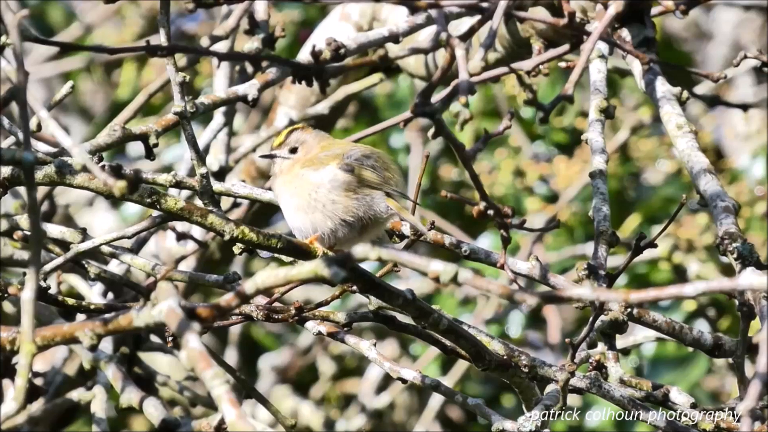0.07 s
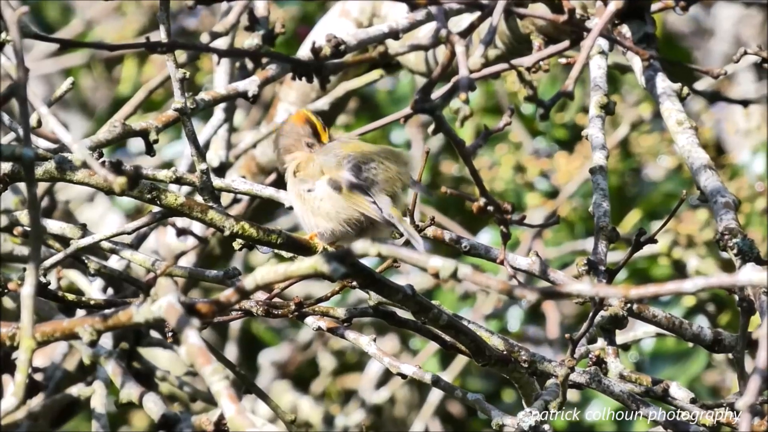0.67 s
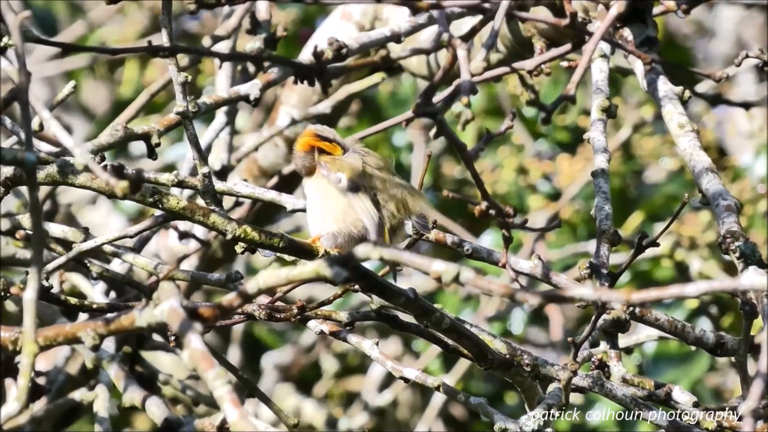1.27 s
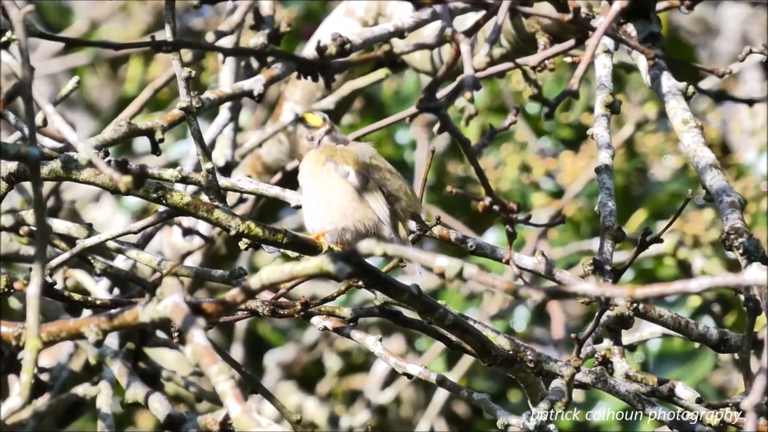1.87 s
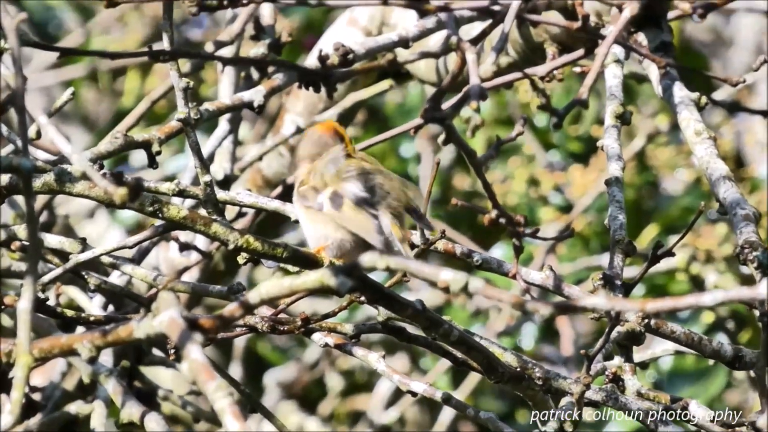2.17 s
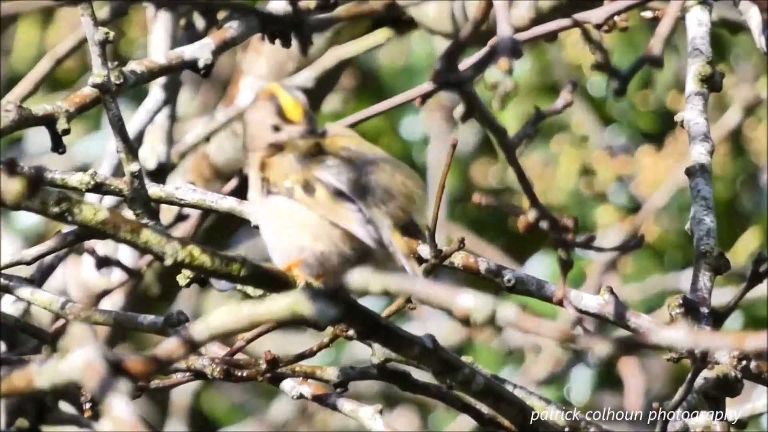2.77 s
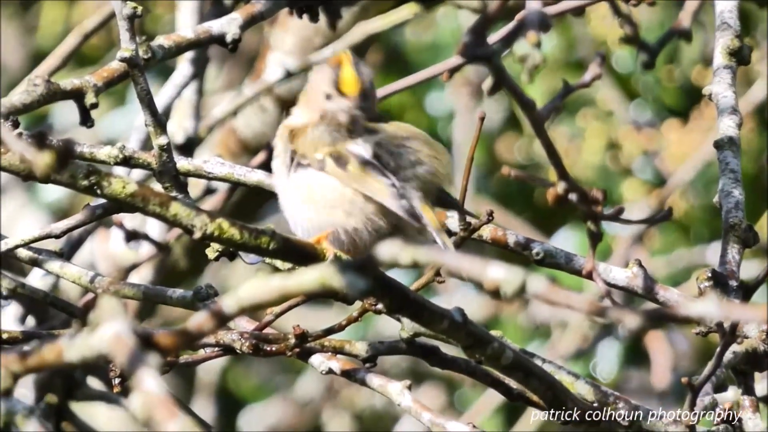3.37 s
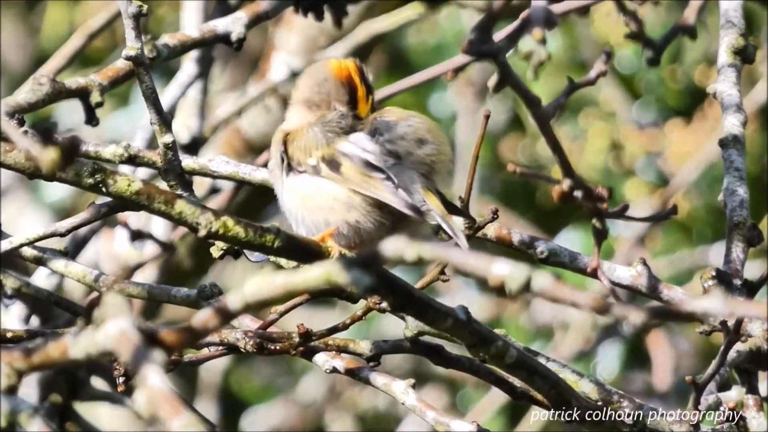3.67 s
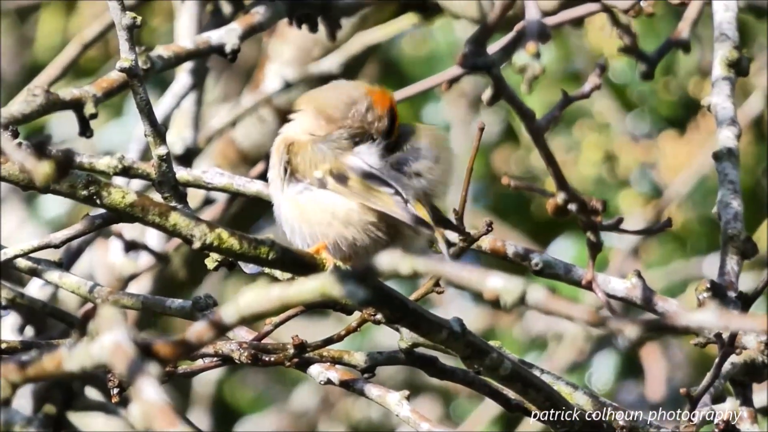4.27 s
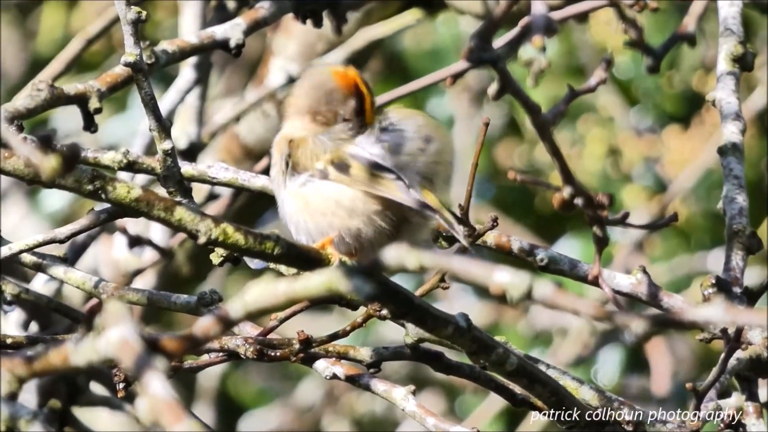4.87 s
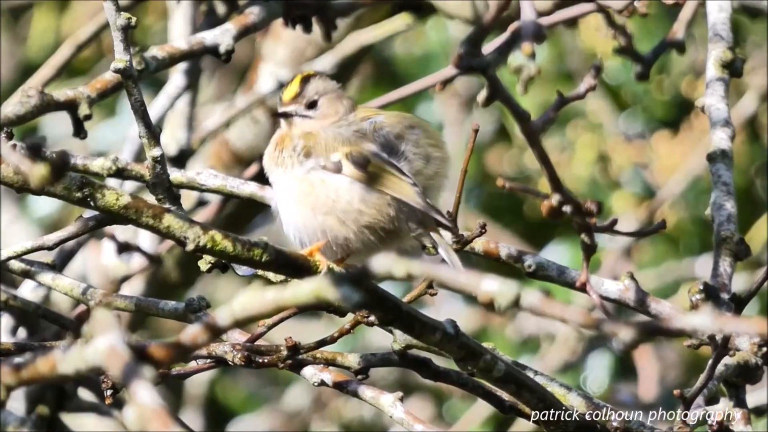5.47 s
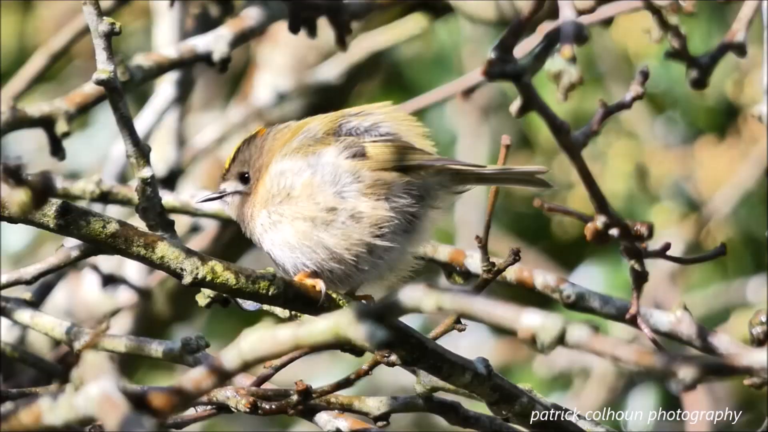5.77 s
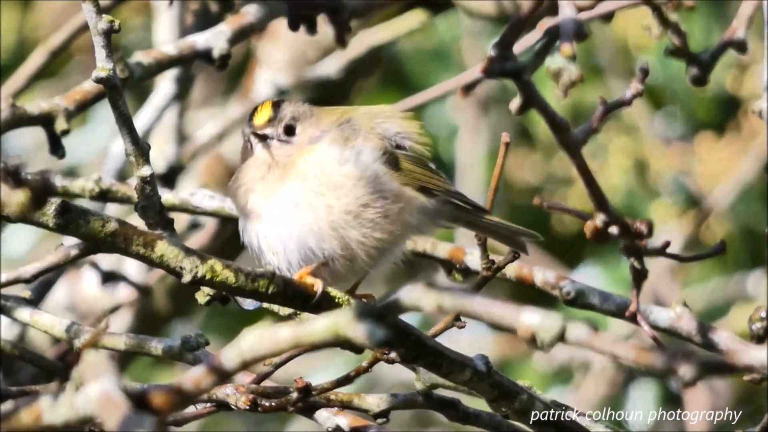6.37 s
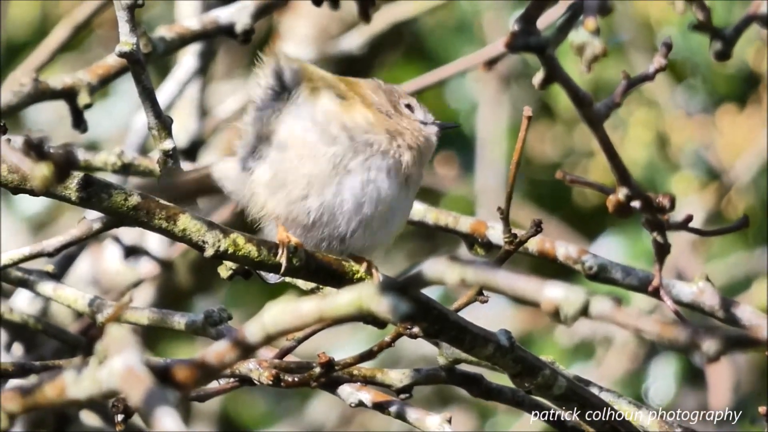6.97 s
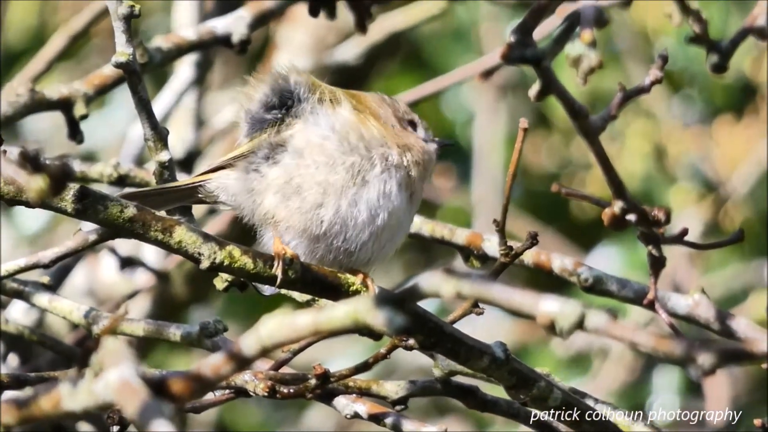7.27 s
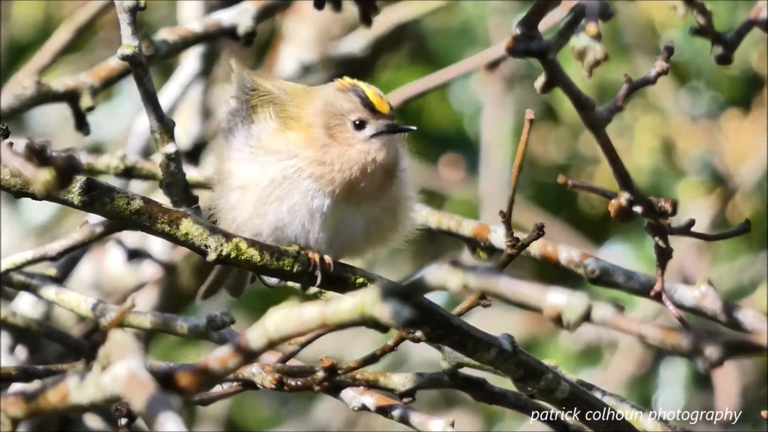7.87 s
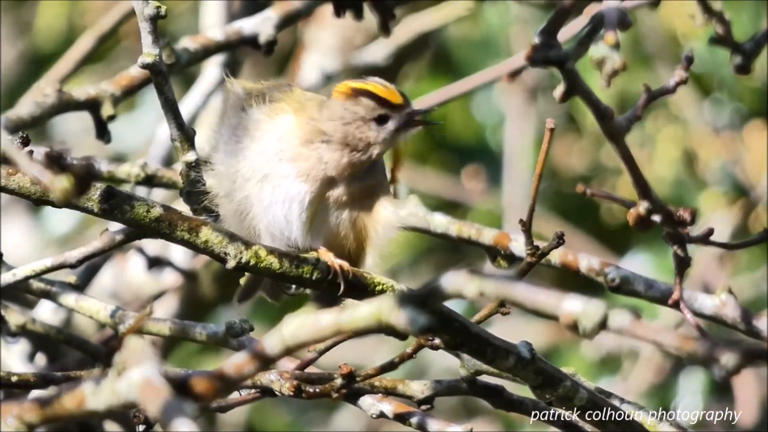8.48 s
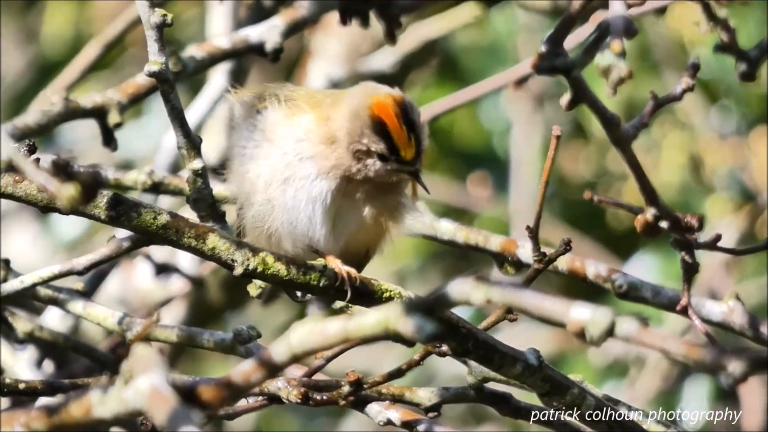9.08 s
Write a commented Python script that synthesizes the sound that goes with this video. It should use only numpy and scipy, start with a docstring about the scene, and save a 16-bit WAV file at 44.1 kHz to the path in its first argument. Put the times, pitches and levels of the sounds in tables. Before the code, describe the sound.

Outdoors, a soft hush of distant traffic and breeze lies under low gusts bumping the microphone. A small bird gives two faint high peeps, then a camera lever clicks and its zoom motor whirrs briefly. Three very thin, falling calls follow clearly. The sound cuts out for an instant and returns windier, with three fainter calls farther off, heavier thumps of wind and a few dry ticks close by.

```python
"""A goldcrest gives thin, falling calls, each a frequency-modulated tone scattered by a thicket.
Behind it lies the broadband hush of distant traffic and breeze, and eddies buffet the microphone.
A camera's lever clicks, its zoom motor whirrs once as gear teeth excite the lens barrel, and a few
dry ticks come from close by. The sound drops out briefly and returns windier, the calls farther off."""
import sys
import numpy as np
from scipy import signal
from scipy.io import wavfile
from scipy.ndimage import uniform_filter1d

SR = 44100
rng = np.random.default_rng(int(sys.argv[2]) if len(sys.argv) > 2 else 0)


def output_pcm(signal):
    """Save a mono or channel-first signal as 16-bit PCM at the path in sys.argv[1].

    Samples are clipped to [-1, 1] before scaling.
    """
    pcm = np.clip(np.atleast_2d(signal).T, -1, 1) * 32767
    wavfile.write(sys.argv[1], SR, np.round(pcm).astype(np.int16))


N = 407484
TIME = np.arange(N) / SR
ZOOM_START_S, ZOOM_END_S = 2.146, 2.782


def from_db(db):
    """Amplitude grows tenfold for every 20 dB."""
    return 10 ** (np.asarray(db) / 20)


def rms_one(x):
    """Normalisation to unit mean power."""
    return x / np.sqrt(np.mean(x ** 2) + 1e-20)


def steady(x, size=2600):
    """Division by the running rms over `size` samples evens out the level."""
    return x / np.sqrt(np.maximum(uniform_filter1d(np.mean(x ** 2, axis=0), size=size), 1e-12))


def in_time(rows):
    """Linear interpolation of timed rows gives one curve per value column."""
    times, *columns = np.transpose(rows)
    return [np.interp(TIME, times, column) for column in columns]


def at_hz(points, hz):
    """Interpolation of a spectrum on a logarithmic frequency axis."""
    frequencies, values = np.transpose(points)
    return np.interp(np.log(hz), np.log(frequencies), values)


def between(start, end, fade=0.0038):
    """A trapezoidal gate: one inside a span, zero outside."""
    return np.clip(np.minimum(TIME - start, end - TIME) / fade + .5, 0, 1)


def pan(db):
    """Left and right gains for an interchannel level difference."""
    return from_db(np.array([[.5], [-.5]]) * db)


def butter(x, hz, kind, order=2):
    """A causal Butterworth filter, maximally flat in its passband."""
    sections = signal.butter(order, np.minimum(hz, .49 * SR), kind, fs=SR, output="sos")
    return signal.sosfilt(sections, x + 1e-18)


def drift(rate_hz):
    """Low-passed noise gives a random wander of unit rms."""
    step = 40
    r = np.exp(-2 * np.pi * step * rate_hz / SR)
    slow = signal.lfilter([1], [1, -2 * r, r * r], rng.standard_normal(N // step + 2002))[2000:]
    return np.interp(np.arange(N) / step, np.arange(len(slow)), rms_one(slow))


def resonate(x, modes):
    """Modal superposition: damped resonators in parallel, alternating in sign."""
    out = 0
    for k, (hz, width, db) in enumerate(modes):
        r = np.exp(-np.pi * width / SR)
        poles = [1, -2 * r * np.cos(2 * np.pi * hz / SR), r * r]
        ringing = signal.lfilter([1, 0, -1], poles, x + 1e-18)
        out = out + (-1) ** k * from_db(db) * (1 - r * r) / 2 * ringing
    return out


def stereo_noise(correlation):
    """Mid and side noise mix to a given interchannel correlation."""
    mid, side = rng.standard_normal((2, N))
    return np.sqrt(1 + correlation) * mid + np.sqrt(1 - correlation) * side * [[1], [-1]]


def banded_noise(spectrum, flicker_db, count, sides=None):
    """Independently modulated noise bands fill a spectrum; the channel mean has unit rms."""
    # Each row: frequency in Hz, correlation between the channels.
    likeness = [(60, 0.49), (130, 0.767), (260, 0.14), (500, 0.32), (1000, 0.59), (2000, 0.13),
                (5000, 0.39), (14000, 0.25)]
    out, edges = 0, np.geomspace(spectrum[0][0], spectrum[-1][0], count + 1)
    for low, high in zip(edges, edges[1:]):
        hz = np.sqrt(low * high)
        band = butter(stereo_noise(at_hz(likeness, hz)), [low, high], "band")
        gain = from_db(at_hz(spectrum, hz) + flicker_db * drift(14.97))
        out = out + band * gain * pan(at_hz(sides, hz) if sides else 0)
    return out / np.std(out.mean(axis=0))


def impact(start, decay_s, impulse_db, grit):
    """A contact force: one impulse, then exponentially decaying grit."""
    impulse = from_db(impulse_db) * (np.arange(N) == int(start * SR))
    age = np.maximum(TIME - start, 0)
    return impulse + grit * (TIME >= start) * np.exp(-np.minimum(age / decay_s, 60))


def preamp():
    """Electronic noise in the preamplifier sets a faint treble floor."""
    # Each row: frequency in Hz, relative spectral density in dB.
    spectrum = [(5000, -4.5), (7000, -19), (9500, 3.5), (12000, -6), (15500, -6)]
    return from_db(-82) * banded_noise(spectrum, flicker_db=1, count=5)


def traffic_and_breeze(echo_s=0.004031, echo_db=-14, dull_share=0.82):
    """Far roar and leaf rustle interfere with their ground reflection, under a fine hiss."""
    # Each row: time in seconds, then relative levels of roar, rustle and hiss in dB.
    levels = [(0.15, -60.5, -73.5, -81.5), (0.254, -59.5, -73.5, -81), (1.442, -58, -72, -81),
              (1.95, -59, -72.5, -80.5), (3.0, -59.5, -74.5, -86.5), (3.806, -59.5, -74, -83),
              (5.352, -59.5, -71.3, -85.5), (5.45, -59.5, -72.5, -86), (5.92, -56, -67.5, -72),
              (6.35, -56.5, -68, -73.3), (6.76, -57.5, -69, -76), (7.42, -56, -67.5, -77.3),
              (9.15, -56.5, -67, -77.5)]
    # Each row of these three: frequency in Hz, relative spectral density in dB.
    roar_spectrum = [(150, -26), (250, -2.5), (398, -2), (506, -4), (687, -0.5), (750, -5), (860, -7),
                     (1030, -4.5), (1090, -3), (1530, -25), (1700, -21.5), (2210, -50), (3740, -120)]
    rustle_spectrum = [(1100, -27), (1500, 2), (2100, 1.5), (2700, -6.5), (3600, -16.5), (5000, -20)]
    hiss_spectrum = [(2200, -10), (3200, 1), (4500, -1.8), (6000, -5.2), (7400, -1.5), (9000, -4.5),
                     (15000, -49)]
    # Each row: frequency in Hz, left minus right level in dB.
    sides = [(300, -0.5), (500, 3), (720, -2.5), (900, 0.5), (1250, 7.5), (1550, 4), (2000, 6), (2800, 1),
             (4000, 1), (9000, -0.5)]
    roar_db, rustle_db, hiss_db = in_time(levels)
    roar = banded_noise(roar_spectrum, flicker_db=2.0033, count=13, sides=sides)
    roar = butter(roar, 1694, "low", order=4)
    # While the lens moves, the roar dulls and then the rustle sinks.
    dull = signal.sosfiltfilt(signal.butter(4, 1000, "low", fs=SR, output="sos"), roar)
    roar = roar + dull_share * between(2.168, 2.82, fade=0.06) * (dull - roar)
    dip = from_db(-5.5 * between(2.42, 2.8, fade=0.02))
    rustle = dip * banded_noise(rustle_spectrum, flicker_db=1.5, count=6, sides=sides)
    hiss = banded_noise(hiss_spectrum, flicker_db=1.75, count=6, sides=sides)
    far = from_db(roar_db + 2.5) * roar + from_db(rustle_db + 0.89) * rustle
    echo = np.array([np.interp(TIME - echo_s, TIME, channel) for channel in far])
    return far + from_db(echo_db) * echo + from_db(hiss_db) * hiss


def treble_hollow(x, rest_hz=8264, zoom_hz=7830, q=13.7):
    """A notch filter cuts a narrow hollow, lower during the zoom and just after it."""
    resting = signal.lfilter(*signal.iirnotch(rest_hz, q, fs=SR), x)
    moving = signal.lfilter(*signal.iirnotch(zoom_hz, q, fs=SR), x)
    return resting + between(ZOOM_START_S, 3.05, fade=0.13) * (moving - resting)


def flow_level(attack_s=0.016, release_s=0.0355):
    """Gusts and the underlying flow are incoherent, so their powers add; the sum is in dB."""
    # Each row: time in seconds, relative level in dB.
    flow = [(.1, -60), (2.8, -60), (5.0, -59), (5.3, -51), (5.9, -47.5), (6.2, -41.5), (6.72, -48.5),
            (7.25, -48), (7.55, -43), (8.1, -48), (8.68, -49), (9.0, -44), (9.2, -37)]
    # Each row: start in seconds, length in seconds, relative level in dB.
    gusts = [(0.427, 0.175, -56), (1.45, 0.104, -44), (1.569, 0.2226, -43), (1.858, 0.15, -41.5),
             (2.11, 0.11, -46), (2.38, 0.049, -44.5), (3.018, 0.0285, -49), (3.137, 0.106, -53.5),
             (3.363, 0.231, -52), (3.894, 0.0812, -46.5), (4.111, 0.169, -53), (4.346, 0.199, -54.5),
             (5.234, 0.065, -43.5), (5.33, 0.03, -46), (5.4, 0.06, -46), (5.536, 0.095, -38.5),
             (6.031, 0.226, -37), (6.303, 0.1192, -34.5), (6.441, 0.231, -42.5), (6.86, 0.13, -39.5),
             (7.03, 0.18, -38.5), (7.322, 0.228, -39.5), (7.614, 0.15, -38.5), (7.785, 0.103, -44),
             (7.908, 0.335, -44.5), (8.293, 0.265, -43.5), (8.76, 0.06, -43), (8.825, 0.08, -37),
             (8.92, 0.08, -39), (9.06, 0.04, -43), (9.145, 0.06, -36.5), (9.205, 0.06, -31)]
    power = from_db(in_time(flow)[0]) ** 2
    for start, length, db in gusts:
        rise = np.clip((TIME - start) / attack_s + .5, 0, 1)
        fall = np.clip((start + length - TIME) / release_s + .5, 0, 1)
        power = power + (from_db(db) * rise * fall) ** 2
    return 10 * np.log10(power)


def wind(crossover_db=-35, spread_db=1.5, lumpy_db=2.0):
    """Turbulence rumbles on the microphone ports; in strong gusts smaller, higher eddies take over."""
    # Each row: frequency in Hz, relative spectral density of the large eddies in dB.
    spectrum = [(18, -45.5), (30, -23.5), (71, -0.5), (102, 4), (167, 2.5), (350, -22.5), (460, -56.5),
                (770, -120)]
    gust_db = flow_level() + lumpy_db * drift(16.55)
    large = steady(banded_noise(spectrum, flicker_db=2.5, count=9))
    small = butter(stereo_noise(0.38), [150, 330], "band", order=3)
    small = steady(butter(small, 1200, "low", order=1))
    small_share = 1 / (1 + np.exp((crossover_db - gust_db) / spread_db))
    eddies = np.sqrt(1 - small_share) * large + np.sqrt(small_share) * small
    return from_db(gust_db - 1.5641 + 1.114 * drift(28)) * eddies * pan(db=1)


def buffets(rise_cycles=0.9):
    """A single large eddy thumps the ports with a heavily damped pressure oscillation."""
    # Each row: start in seconds, relative level in dB, frequency in Hz.
    thumps = [(0.526, -40, 130), (1.586, -27, 154.1), (1.861, -29, 82), (1.951, -22.5, 170),
              (2.091, -31.5, 295.8), (3.165, -32, 77), (5.544, -28.5, 166), (5.592, -26, 200),
              (5.67, -27, 125), (6.105, -22, 212.5), (6.148, -19.5, 206.6), (6.329, -18.5, 317),
              (6.346, -21, 350), (6.4, -23.5, 121.1), (6.9, -26.5, 251.7), (7.109, -23.5, 273),
              (7.185, -27, 150), (7.685, -24.5, 196), (7.853, -26, 109.4), (8.165, -33.5, 110.2),
              (8.33, -29, 105.5), (9.148, -23.5, 160), (9.215, -15.5, 149)]
    out = np.zeros(N)
    for start, db, hz in thumps:
        cycles = np.clip((TIME - start) * hz, 0, 30)
        envelope = cycles / rise_cycles * np.exp(1 - cycles / rise_cycles)
        out += from_db(db) * envelope * np.sin(2 * np.pi * cycles)
    return from_db(-6) * out * pan(db=3)


def zoom_motor(hunting=.015, tooth_db=.8, throb=1.2, buzz_db=26, whine_db=-71, whine_rise_s=0.012):
    """Forced vibration: gear teeth knock the lens barrel while the motor buzzes high above."""
    # Each row: time in seconds, teeth per second, knock level in dB.
    gear = [(2.144, 68, -57), (2.165, 98, -56.5), (2.185, 120, -62), (2.225, 165, -63), (2.305, 108, -62.5),
            (2.34, 168, -61.5), (2.385, 205, -62.5), (2.455, 158, -66), (2.53, 210, -67.5),
            (2.61, 176, -67.5), (2.69, 158, -68.5), (2.78, 150, -74.5)]
    # Each row of these two: resonance in Hz, bandwidth in Hz, gain in dB.
    barrel_modes = [(1240, 60, -8), (1720, 90, -7.5), (1980, 260, -11), (2510, 200, -6), (2865, 190, -1.5),
                    (3290, 90, -15)]
    motor_modes = [(8900, 500, -13), (9550, 200, -4), (9890, 200, 1), (10120, 260, -3), (12000, 450, -18),
                   (13500, 500, -23)]
    age = np.maximum(TIME - ZOOM_START_S, 0)
    tooth_hz, knock_db = in_time(gear)
    teeth_passed = np.cumsum(tooth_hz * (1 + hunting * drift(40)) * (age > 0)) / SR
    # Each tooth lands with a slightly different force, then rattles a little.
    teeth = np.diff(np.ceil(teeth_passed), prepend=0) * from_db(tooth_db * drift(90))
    contact = np.exp(-(teeth_passed % 1) / .25)
    rattle = .2 * stereo_noise(-.3) * contact
    knocks = butter(resonate(teeth + rattle, barrel_modes), 3300, "low", order=4)
    knocks = from_db(knock_db) * steady(knocks, size=900) * pan(db=-4)
    rasp = stereo_noise(0.56) * (1 + throb * contact)
    whine = resonate(rasp + from_db(buzz_db) * teeth, motor_modes)
    whine = from_db(whine_db + 1.4 * drift(25)) * steady(whine, size=900) * pan(db=-6)
    running = between(ZOOM_START_S, ZOOM_END_S, fade=0.002)
    return running * (knocks + whine * (1 - np.exp(-age / whine_rise_s)))


def zoom_lever():
    """Impacts excite modes: the lever scrapes with a thin ring, then clicks home on the camera body."""
    # Each row: start in seconds, relative force in dB, decay in seconds, share reaching the body.
    contacts = [(2.017, -41.5, 0.0091, 0.2), (2.029, -39, 0.0056, 0.13), (2.04, -46.5, 0.0055, 0.1),
                (2.067, -48, 0.022, 1), (2.077, -35.5, 0.004, 1), (2.084, -31, 0.00402, 0.93)]
    # Each row of these two: resonance in Hz, bandwidth in Hz, gain in dB.
    body_modes = [(680, 80, 7), (1230, 57, 12), (1890, 90, 2), (2060, 80, 3), (2550, 130, 2.5),
                  (2860, 130, 0), (3290, 90, -2), (4560, 90, -12), (5050, 130, -8), (5330, 110, -6),
                  (6160, 90, -3), (6800, 120, -19), (7270, 150, -17), (9600, 1400, -13), (12100, 1200, -19),
                  (14200, 1600, -22)]
    lever_modes = [(1650, 90, 2), (1970, 160, -2), (2550, 140, -5), (2900, 180, -1), (3300, 160, -3),
                   (6650, 400, -12), (9800, 900, -13)]
    on_body, on_lever, grit = 0, 0, stereo_noise(0.283)
    for start, db, decay_s, share in contacts:
        force = from_db(db) * impact(start, decay_s, impulse_db=14, grit=grit)
        on_body = on_body + share * force
        on_lever = on_lever + (1 - share) * force
    return from_db(-3) * (resonate(on_body, body_modes) + resonate(on_lever, lever_modes))


def ticks():
    """Each dry snap is a band-limited transient: one crack and a little grit."""
    # Each row: start in seconds, peak before panning in dB, centre in Hz, bandwidth in Hz,
    # decay in seconds, left minus right level in dB.
    snaps = [(1.346, -52, 1900, 900, 0.005, 0), (1.352, -47, 2000, 1000, 0.006, 0),
             (5.508, -57, 4300, 600, 0.005, -1), (5.511, -53, 2600, 1300, 0.008, -1),
             (8.19, -46.5, 1760, 700, 0.0073, 2), (8.726, -35, 1950, 850, 0.003, 7.5),
             (8.93, -43.5, 6500, 9000, 0.0024, -5), (8.932, -48.5, 3400, 1800, 0.003, -3)]
    out, grit = 0, stereo_noise(0.27)
    for start, db, hz, width, decay_s, side_db in snaps:
        force = impact(start, decay_s, impulse_db=16, grit=grit)
        snap = butter(force, [max(hz - width / 2, 300), hz + width / 2], "band", order=3)
        out = out + from_db(db) * snap / np.abs(snap).max() * pan(side_db)
    return out


def thicket(x, t60, twig_t60, twig_db, correlation):
    """Scattering: nearby twigs return many quick echoes, and farther trunks add a longer tail."""
    age = np.arange(SR // 2) / SR
    decay = from_db(-60 * age / t60) + from_db(twig_db - 60 * age / twig_t60)
    strengths = stereo_noise(correlation)[:, :len(age)]
    arrivals = (rng.random(len(age)) < .08) * (age > .002)
    echoes = strengths * arrivals * decay
    echoes /= np.sqrt(np.sum(echoes ** 2, axis=1, keepdims=True))
    return signal.fftconvolve(x[None], echoes, axes=1)[:, :N]


def whistles(calls, rasp_db, waver=0.004, flutter_db=1.5):
    """Frequency modulation: a shivering tone flicks up, sags and drops off; a faint scratch opens it."""
    flick_s, sag_start_s, sag_share = 0.014, .017, .23
    swell_db, drop_s, drop_hz, drop_db = 15.5, 0.0077, 700, 16.5
    tremble = 1 + waver * rms_one(butter(rng.standard_normal(N), [150, 700], "band"))
    flutter = flutter_db * (drift(70) + drift(300))
    scratch = rms_one(butter(rng.standard_normal(N), [4900, 7600], "band"))
    out = np.zeros(N)
    for start, length, top_hz, end_hz, db, flick_hz, swell_share in calls:
        span = (TIME >= start) & (TIME < start + length)
        age = TIME[span] - start
        flick = np.maximum(1 - age / flick_s, 0) ** 2
        sag = np.exp(-np.maximum(age - sag_start_s, 0) / (sag_share * length))
        drop = np.maximum(1 - (length - age) / drop_s, 0)
        hz = end_hz + (top_hz - end_hz) * sag - flick_hz * flick - drop_hz * drop
        soft_start = np.exp(-age / (swell_share * length))
        level_db = db - swell_db * soft_start - drop_db * drop + flutter[span]
        tone = from_db(level_db) * np.sin(2 * np.pi * np.cumsum(hz * tremble[span]) / SR)
        rasp = from_db(db + rasp_db) * scratch[span] * np.exp(-age / 0.017)
        out[span] += (tone + rasp) * between(start, start + length)[span]
    return out


def goldcrest():
    """The direct-to-reverberant ratio falls with distance: far calls arrive mostly as scatter."""
    # Each row of these two: start in seconds, length in seconds, top pitch in Hz, pitch it sags towards
    # in Hz, relative level in dB, opening flick in Hz, swell time constant as a share of the length.
    near_calls = [(1.108, .034, 6600, 6400, -71, 300, .3), (1.877, .049, 8300, 7800, -64.5, 2000, .2),
                  (3.081, .139, 8450, 7260, -49.7, 2500, .24), (3.28, .107, 7950, 7050, -47.5, 2500, .12),
                  (3.457, .073, 7620, 6990, -47.7, 2200, .1)]
    far_calls = [(5.79, .1, 8200, 7620, -66, 1000, .2), (5.938, .122, 8100, 7220, -61.5, 1000, .06),
                 (6.115, .135, 7850, 7060, -57.5, 1000, .22)]
    near = whistles(near_calls, rasp_db=-20)
    far = whistles(far_calls, rasp_db=-13)
    near_scatter = from_db(-3.7) * thicket(near, t60=0.36, twig_t60=0.17, twig_db=1, correlation=0.77)
    far_scatter = from_db(1.5) * thicket(far, t60=0.35, twig_t60=0.27, twig_db=2, correlation=0.89)
    direct = from_db(1) * near + from_db(-11) * far
    return (direct + near_scatter + far_scatter) * pan(db=-0.5)


def scene():
    """Superposition: the bird stands clear above a background with a hollow in its treble."""
    background = treble_hollow(traffic_and_breeze() + preamp() + zoom_motor())
    return background + goldcrest() + wind() + buffets() + zoom_lever() + ticks()


def record(dry, bass_cut_hz=58, top_cut_hz=15600):
    """Gating leaves two stretches of sound; band-limiting removes the deep bass and the top."""
    # Each row: start and end of a stretch of sound in seconds.
    stretches = [(0.102, 5.686), (5.876, 9.3)]
    gate = sum(between(start, end) for start, end in stretches)
    low_pass = signal.ellip(10, .1, 80, top_cut_hz, fs=SR, output="sos")
    return signal.sosfilt(low_pass, gate * butter(dry, bass_cut_hz, "high"))


dry = scene()
out = record(dry)
output_pcm(out)
```